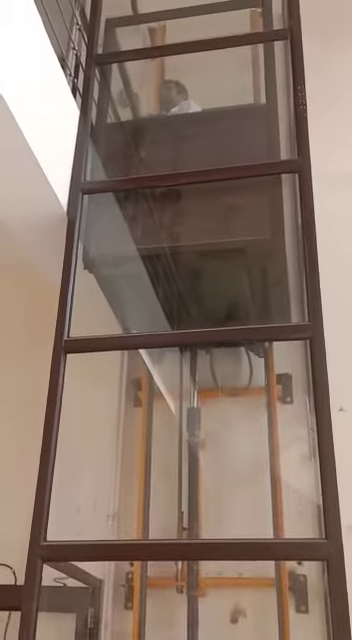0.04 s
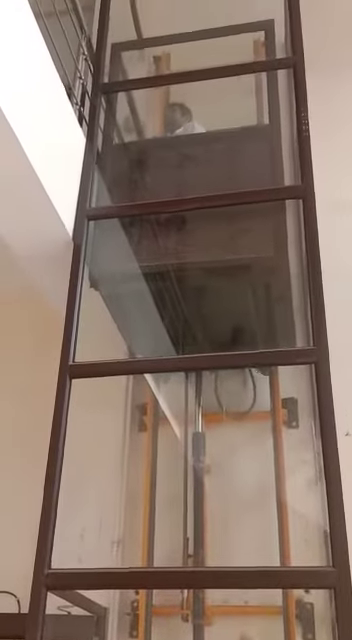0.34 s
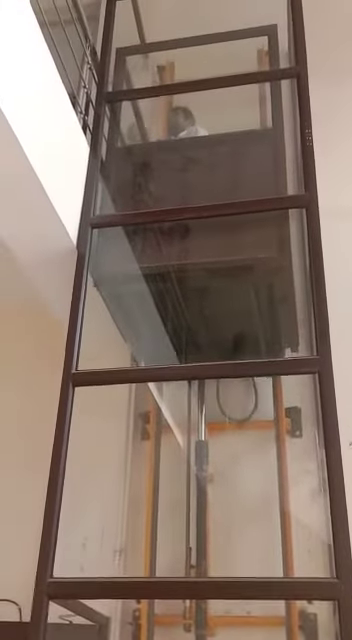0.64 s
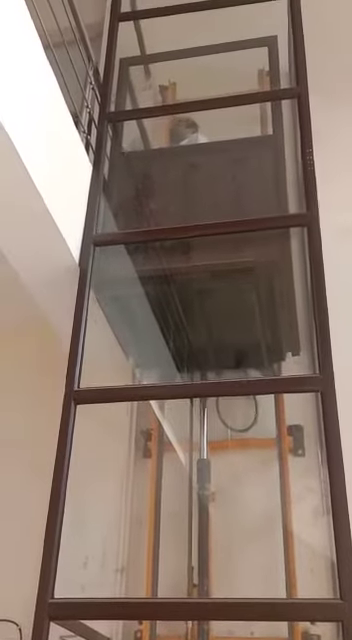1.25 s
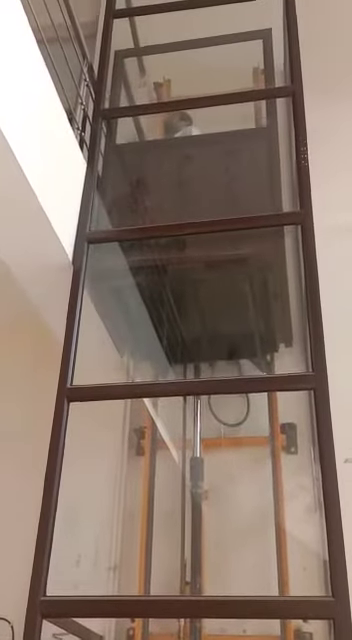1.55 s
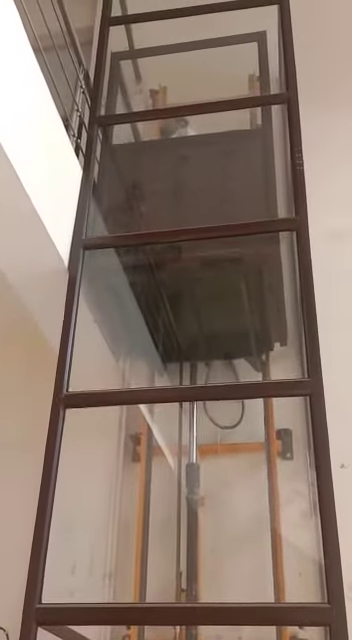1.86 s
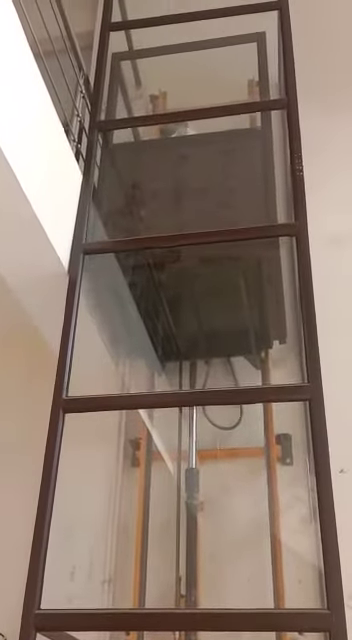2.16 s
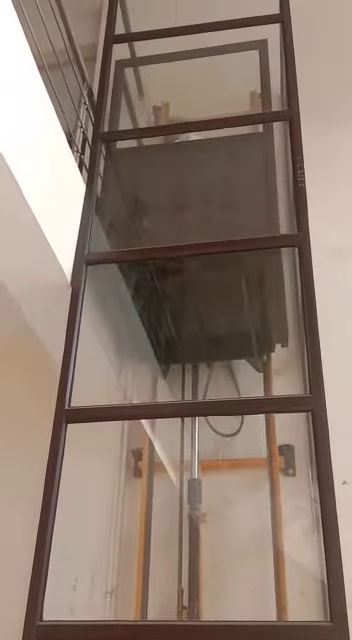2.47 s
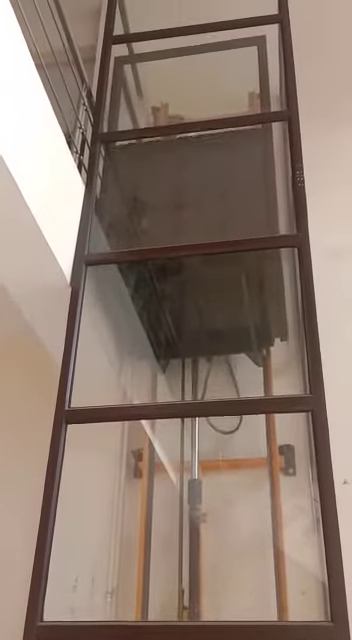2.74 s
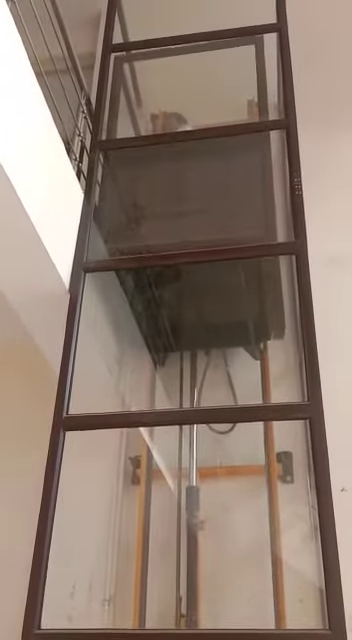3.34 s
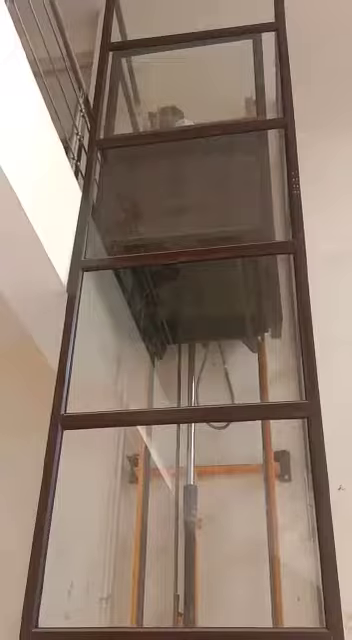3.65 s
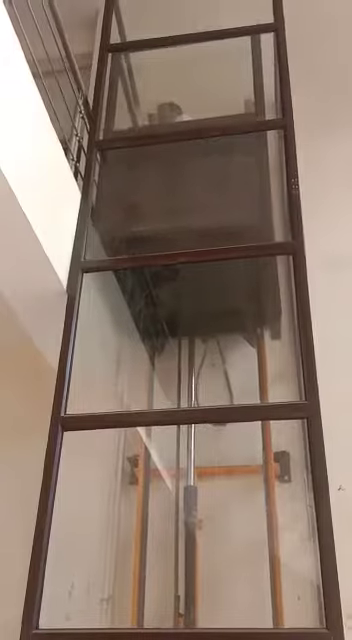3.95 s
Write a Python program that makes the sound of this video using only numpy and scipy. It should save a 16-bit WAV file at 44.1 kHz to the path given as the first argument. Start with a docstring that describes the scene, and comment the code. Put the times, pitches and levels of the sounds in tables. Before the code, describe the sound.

Bright, steady whine of a hydraulic pump raising a lift in a hall.

```python
"""The bright, steady whine of a hydraulic pump, raising a lift in a glazed shaft in a hard-walled hall.
Nine strokes a turn make the whine; their unevenness adds sidebands at multiples of the pump's shaft rate.
Each tone swells and fades in the hall's standing waves.
Underneath lies a bed of rushing oil, mains hum from the motor and the low rumble of the car."""
import sys
import numpy as np
from scipy.fft import rfft, irfft, next_fast_len
from scipy.io import wavfile
from scipy.ndimage import map_coordinates

SR = 44100
rng = np.random.default_rng(int(sys.argv[2]) if len(sys.argv) > 2 else 0)


def store_wav(level_fs):
    """Save 16-bit WAV to argv[1]."""
    pcm = np.round(np.clip(np.atleast_2d(level_fs), -1, 1) * 32767)
    wavfile.write(sys.argv[1], SR, pcm.T.astype(np.int16))


N = 176400
TOP_HZ = 15620


def amp(db):
    """Decibels to gain."""
    return 10 ** (np.asarray(db) / 20)


def eq_at(points, hz):
    """Read an EQ curve of (f/Hz, level/dB) points on a log frequency axis."""
    freqs, db = np.transpose(points)
    return np.interp(np.log(hz + 1), np.log(freqs + 1), db)


def envelope(points):
    """Straight ramps through (t/s, value) points, one value per sample."""
    return np.interp(np.arange(N) / SR, *np.transpose(points))


def wobble(per_s, size=N):
    """Smooth random modulation across the scene, with per_s knots a second."""
    knots = rng.standard_normal(1024)
    return map_coordinates(knots, [np.linspace(0, N / SR * per_s, size) + 2], mode="wrap")


def filtered(x, response):
    """Filter x with a gain given as a function of frequency."""
    size = next_fast_len(N + SR // 2)
    return irfft(rfft(x, size) * response(np.fft.rfftfreq(size, 1 / SR)), size)[..., :N]


def noise(eq):
    """Noise coloured by an EQ curve, at rms 1."""
    x = filtered(rng.standard_normal(N), lambda hz: amp(eq_at(eq, hz)))
    return x / x.std()


# Colour of the rumble: f/Hz, relative level/dB
RUMBLE_EQ = [(10, -40), (30, -28), (40, -7), (52, -17), (65, -3), (90, 1.5), (125, -2.5), (170, -5.5),
             (215, -2), (260, -16.5), (400, -24), (900, -60)]
# Fader ride on the rumble: t/s, level/dB
RUMBLE_RIDE = [(0, -41), (1.2, -42), (1.38, -34), (1.68, -33.5), (2.15, -34), (2.6, -38), (3.05, -35.5),
               (3.5, -40.5), (4, -46)]
def car_rumble():
    """A low rumble that swells as the car travels."""
    return amp(envelope(RUMBLE_RIDE) + 0.54 * wobble(per_s=8.7)) * noise(RUMBLE_EQ)


# Partials of the hum: f/Hz, rms level/dB
HUM_PARTIALS = [(100, -45.5), (150, -60), (300, -41.5)]
def motor_hum():
    """The motor's iron hums in steady mains tones that beat against the low shaft tones."""
    t = np.arange(N) / SR
    return sum(np.sqrt(2) * amp(db) * np.sin(2 * np.pi * (hz * t + rng.random()))
               for hz, db in HUM_PARTIALS)


# Near-steady spin of the pump shaft: t/s, f/Hz
SHAFT_SPEED = [(0, 47.758), (.5, 47.744), (.7, 47.773), (1.1, 47.772), (1.43, 47.746), (2.8, 47.807),
               (4, 47.803)]
def shaft_rotation():
    """The shaft clocks both oil and whine: returns its running count of turns and mean rate in Hz."""
    speed = envelope(SHAFT_SPEED)
    return np.cumsum(speed) / SR, speed.mean()


# Colour of the oil rush and hall noise: f/Hz, relative level/dB
RUSH_EQ = [(28, -35), (50, -9), (100, -10), (230, 0), (320, -6), (450, -4), (650, -10), (1000, -12.5),
           (1500, -12.5), (2200, -10), (3000, -14.5), (4000, -17.5), (6000, -20), (7500, -18.5),
           (9000, -23.5), (10500, -40), (12000, -39), (14500, -41)]
RUSH_DB, PULSE_DEPTH = -30, 0.19
def oil_rush(turns):
    """Oil rushes through the valve and pipe, pulsing with each turn of the pump."""
    pulse = 1 + PULSE_DEPTH * np.cos(2 * np.pi * turns)
    return amp(RUSH_DB + 0.89 * wobble(per_s=4.56)) * pulse * noise(RUSH_EQ)


FADE_PER_S, FADE_PER_S_PER_KHZ = 1.503, 0.2996  # high tones swell and fade faster
FLUTTER_DEPTH, FLUTTER_PER_KHZ = 0.079, 0.016  # and flutter deeper
def hall_path(hz, wet):
    """One tone's complex gain, mean size 1: direct sound, shifting reflections and a quick flutter."""
    def drift(per_s):
        return wobble(per_s, size=400) + 1j * wobble(per_s, size=400)
    khz = hz / 1000
    reflections = wet * drift(FADE_PER_S + FADE_PER_S_PER_KHZ * khz)
    flutter = (FLUTTER_DEPTH + FLUTTER_PER_KHZ * khz) * drift(per_s=26)
    gain = 1 + reflections + flutter
    gain = gain / np.abs(gain).mean() * np.exp(2j * np.pi * rng.random())
    return np.interp(np.arange(N), np.linspace(0, N, len(gain)), gain)


# Buzz of shaft harmonics one, two or more steps from a whine tone: f/Hz, level/dB before trim
BUZZ_NEXT = [(400, -41), (1400, -58.5), (2100, -66), (4800, -51), (6200, -51), (8500, -53), (9600, -58),
             (11800, -73.5), (14700, -64)]
BUZZ_SECOND = [(400, -53.5), (2100, -50), (5700, -59), (8500, -62.5), (9600, -64.5), (11800, -75),
               (14700, -63)]
BUZZ_FAR = [(400, -67), (1400, -52.5), (2100, -61), (3800, -57), (5700, -61.5), (7600, -61.5), (8600, -58),
            (9600, -74), (11800, -77), (14700, -72)]
# Shaft tones and sidebands that stand out: shaft harmonic, level/dB before trim
SIDEBANDS = [(3, -38), (6, -57), (10, -46), (11, -48), (16, -42.5), (20, -47), (34, -40.5), (35, -45),
             (43, -36), (44, -39), (46, -45.5), (47, -31.5), (49, -45), (52, -31), (53, -41), (55, -44),
             (56, -39.5), (60, -51.5), (61, -36.5), (62, -46.5), (64, -49), (65, -42.6), (70, -43.2),
             (71, -50.5), (74, -45), (88, -54), (92, -42), (97, -46.5), (101, -43), (106, -44.5),
             (110, -45), (134, -43.5), (136, -40.5), (137, -56.5), (146, -63.5), (152, -43), (155, -48),
             (156, -43.5), (170, -47)]
# The whine itself: stroke harmonic, level/dB before trim and top cut
WHINE_PARTIALS = [(1, -35), (2, -33.5), (3, -49.5), (4, -36.5), (5, -23), (6, -35.0), (7, -32.5),
                  (8, -40.5), (9, -37.5), (10, -39), (11, -32), (12, -54), (13, -48.5), (14, -47),
                  (15, -43), (16, -44.5), (17, -47), (18, -43), (19, -45.5), (20, -48.5), (21, -48),
                  (22, -60), (23, -66), (24, -58), (25, -59), (26, -58), (27, -71), (28, -50), (29, -64),
                  (30, -54), (31, -66), (32, -50), (33, -59), (34, -42.5), (35, -64), (36, -51)]
# Top cut that softens the whine: f/Hz, gain/dB
WHINE_TOP_CUT = [(9500, 0), (12000, -3), (15000, -2)]
STROKES = 9  # per turn
BUZZ_TRIM_DB, SIDEBAND_TRIM_DB, WHINE_TRIM_DB = -0.1, 0.18, -0.11
def pump_spectrum(shaft_hz):
    """Level in dB by shaft harmonic: the strokes sound every ninth, their unevenness those between."""
    levels = {}
    for k in range(STROKES, int(TOP_HZ / shaft_hz) + 1):
        steps = min(k % STROKES, -k % STROKES)
        buzz = BUZZ_NEXT if steps == 1 else BUZZ_SECOND if steps == 2 else BUZZ_FAR
        levels[k] = eq_at(buzz, k * shaft_hz) + BUZZ_TRIM_DB
    levels.update({round(k): db + SIDEBAND_TRIM_DB for k, db in SIDEBANDS})
    for k, db in WHINE_PARTIALS:
        levels[STROKES * round(k)] = db + WHINE_TRIM_DB + eq_at(WHINE_TOP_CUT, k * STROKES * shaft_hz)
    return levels


# Standing-wave swells on leading whine tones, named by stroke harmonic: t/s, gain/dB
SWELL_1 = [(0.0, 1), (0.56, -3.7), (0.7, 2.5), (1.54, 3), (2.52, -1.2), (2.66, -12), (2.73, 0.5),
           (3.15, -3.0), (3.57, 0.7), (3.99, -0.5)]
SWELL_2 = [(0.0, -1), (0.35, -8.2), (0.77, 0.5), (1.33, 0.5), (1.54, -5.5), (2.03, 2), (2.31, -1.4),
           (2.94, 3), (3.99, 2.5)]
SWELL_4 = [(0.0, -1), (0.63, -16), (0.7, -1), (1.05, 7.5), (2.24, 3), (2.52, -8), (2.66, -6), (3.01, 0),
           (3.36, 1.5), (3.99, -1.5)]
SWELL_5 = [(0, 0.5), (.2, -3.5), (.36, 1), (.56, 3.3), (.7, 0.5), (.82, -8), (1.05, -3.5), (1.2, -5.5),
           (1.43, 3), (1.63, 0.5), (1.75, -3), (1.96, -6), (2.15, -2), (2.38, -5.3), (2.52, -1),
           (2.95, 2.5), (3.43, 4), (3.72, 1), (4, 5.5)]
SWELL_6 = [(0.0, -2), (0.42, -1), (0.56, -6), (2.31, 6.5), (2.45, 2.5), (2.94, 0), (3.08, -19), (3.78, -9),
           (3.99, 3)]
SWELL_7 = [(0.0, 6.5), (0.7, 0.5), (0.84, 2.5), (2.38, 3.5), (2.59, -9), (3.29, -20), (3.5, -3), (3.99, -5)]
SWELL_11 = [(0, -14), (.35, -5), (.83, 3.5), (1.05, 1.5), (1.3, 1), (1.6, -6), (1.9, 4), (2.24, -13),
            (2.45, -0.5), (2.58, -8), (2.75, 0.5), (4, 0)]
SWELL_15 = [(0, -13), (.45, -2), (1.1, -4), (1.7, 4), (2.25, -6), (2.65, -1), (3.4, 8.5), (4, 7)]
SWELL_34 = [(0, -7), (.45, -5), (.75, 0), (1.2, -4), (1.6, 4), (2.4, 0), (3, 0), (3.35, -13), (4, -7)]
# Swells on sidebands two shaft harmonics below or above a whine tone: t/s, gain/dB
SWELL_BELOW_2 = [(0, -1), (.55, 0.5), (1.3, 4), (1.65, -2), (2.3, -1.5), (2.9, 4), (3.6, -4), (4, -6)]
SWELL_BELOW_5 = [(0.0, -2), (1.26, 1), (1.33, -11.7), (2.17, 1.4), (2.31, -4), (3.01, 6), (3.99, -3)]
SWELL_ABOVE_5 = [(0.0, 3), (0.63, -3.5), (1.33, 1.5), (1.68, -10), (2.03, 0), (2.1, -3), (2.45, -5),
                 (3.99, -1.9)]
SWELL_BELOW_6 = [(0.0, 3.5), (0.7, -3), (0.91, 0.5), (1.47, -3.5), (1.96, 5), (2.1, -5), (3.99, -5)]
SWELL_BELOW_7 = [(0.0, -19), (0.7, 5), (1.33, 3), (1.47, -17.9), (1.82, -8), (2.31, 4), (3.99, -2.5)]
SWELL_ABOVE_10 = [(0, -3), (.6, 3), (.85, -10), (1.5, -2), (1.78, -2), (2.25, 7.5), (2.8, 1), (4, 1.5)]
# Routing: shaft harmonic, the swell it follows
SWELLS = {9: SWELL_1, 18: SWELL_2, 36: SWELL_4, 45: SWELL_5, 54: SWELL_6, 63: SWELL_7, 99: SWELL_11, 135:
          SWELL_15, 306: SWELL_34, 16: SWELL_BELOW_2, 43: SWELL_BELOW_5, 47: SWELL_ABOVE_5, 52:
          SWELL_BELOW_6, 61: SWELL_BELOW_7, 92: SWELL_ABOVE_10}
JITTER_TURNS, HALL_WET = 0.000079, 0.63  # uneven rotation; reflected over direct sound
TREMOR_DB_PER_KHZ, RASP_DB_PER_KHZ = 0.0641, 0.14  # the treble trembles, and brightens once a turn
def pump_whine(turns, shaft_hz):
    """All tones are locked to the shaft; each reaches the listener by its own path through the hall."""
    rotor = np.exp(2j * np.pi * (turns + JITTER_TURNS * wobble(per_s=57)))
    tilt_db_per_khz = TREMOR_DB_PER_KHZ * wobble(per_s=30) + RASP_DB_PER_KHZ * rotor.real
    harmonic_step = rotor * amp(tilt_db_per_khz * shaft_hz / 1000)
    levels = pump_spectrum(shaft_hz)
    tone, whine = np.ones(N, complex), np.zeros(N)
    for k in range(1, max(levels) + 1):
        tone = tone * harmonic_step  # one harmonic up, one more dose of tilt
        if k in SWELLS:  # a drawn swell stands in for the random reflections
            gain = amp(levels[k] + envelope(SWELLS[k]))
            whine += gain * (tone * hall_path(k * shaft_hz, wet=0)).real
        elif k in levels:
            wet = HALL_WET if k > STROKES else 0
            whine += amp(levels[k]) * (tone * hall_path(k * shaft_hz, wet)).real
    return np.sqrt(2) * whine  # rms levels to sine peaks


def scene():
    """Mono mix: the pump's whine over hum, oil and rumble."""
    turns, shaft_hz = shaft_rotation()
    return (pump_whine(turns, shaft_hz) + motor_hum() + oil_rush(turns) + car_rumble())[None]


def record(dry):
    """A brick-wall low-pass on the whole mix."""
    return filtered(dry, lambda hz: hz < TOP_HZ)


dry = scene()
out = record(dry)
store_wav(out)
```